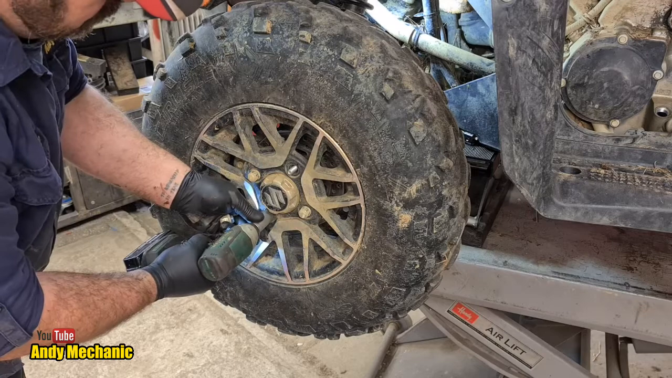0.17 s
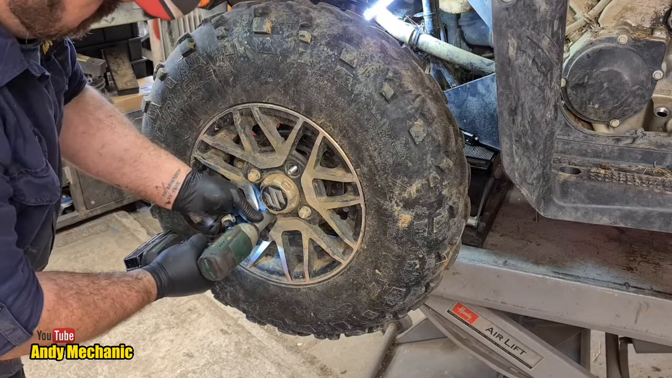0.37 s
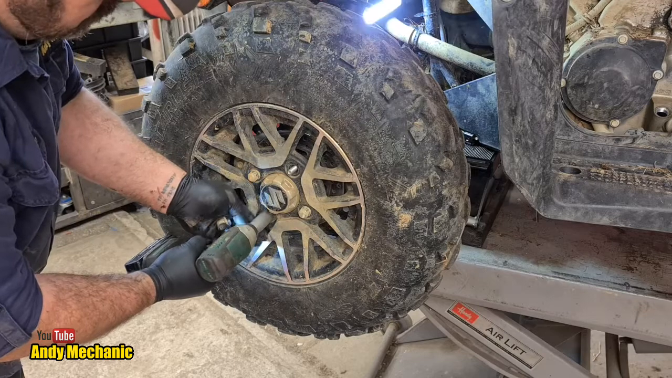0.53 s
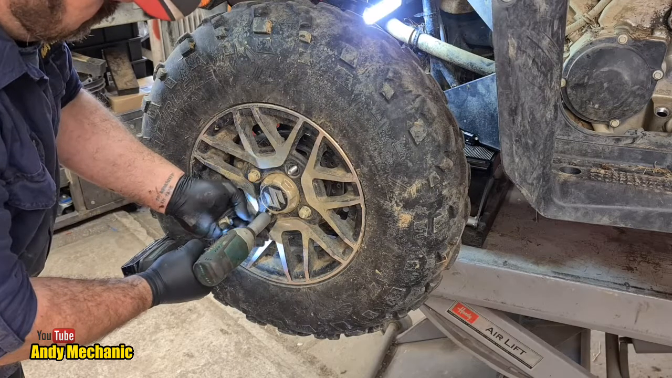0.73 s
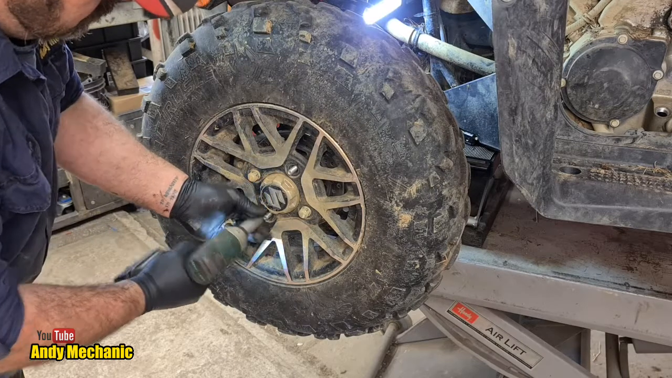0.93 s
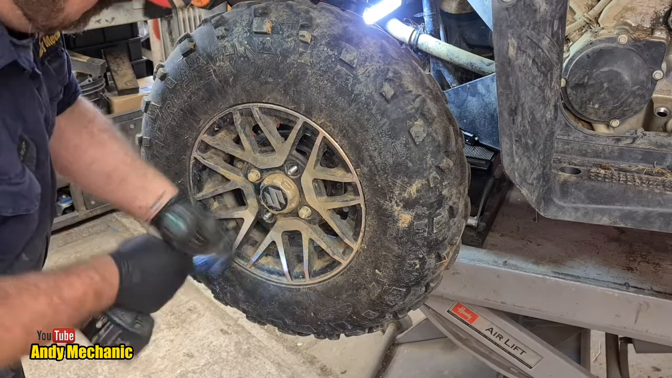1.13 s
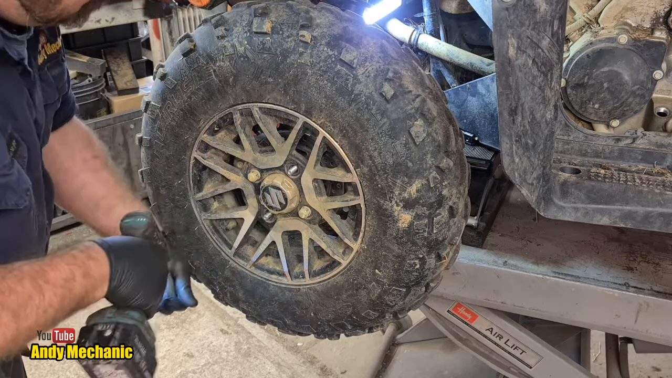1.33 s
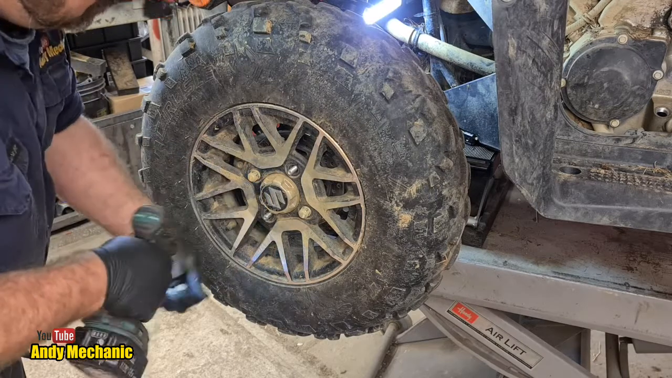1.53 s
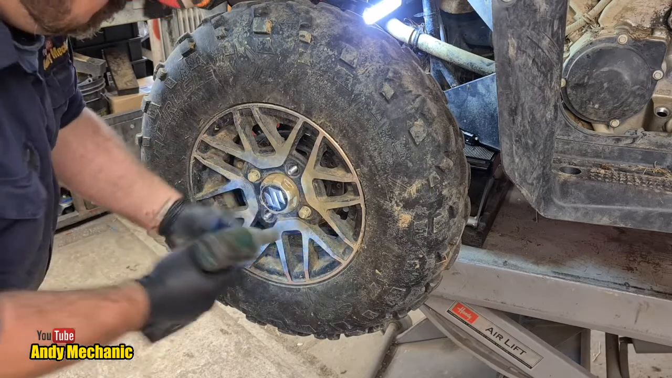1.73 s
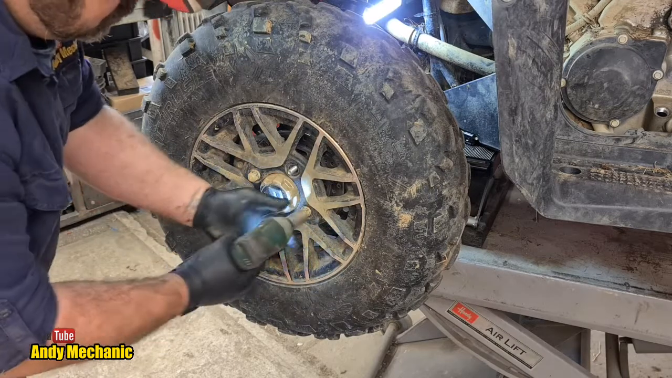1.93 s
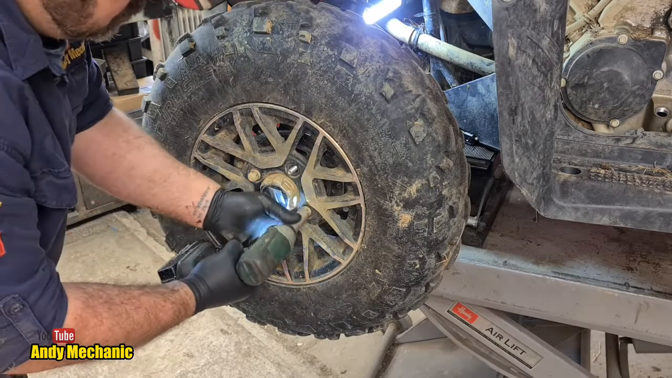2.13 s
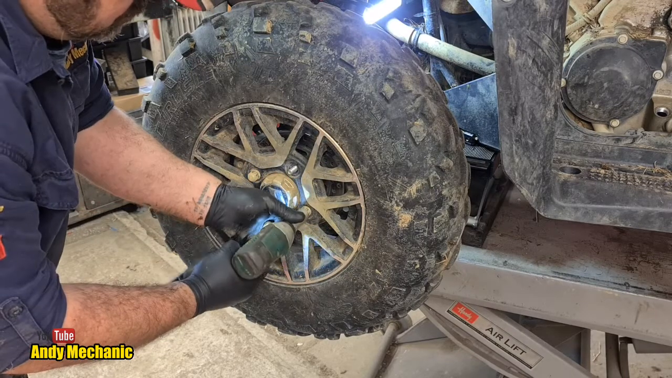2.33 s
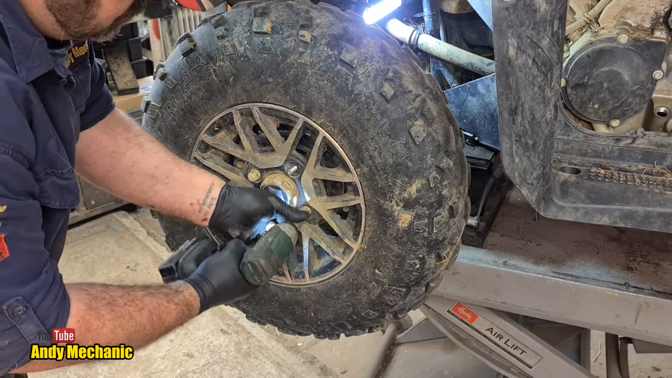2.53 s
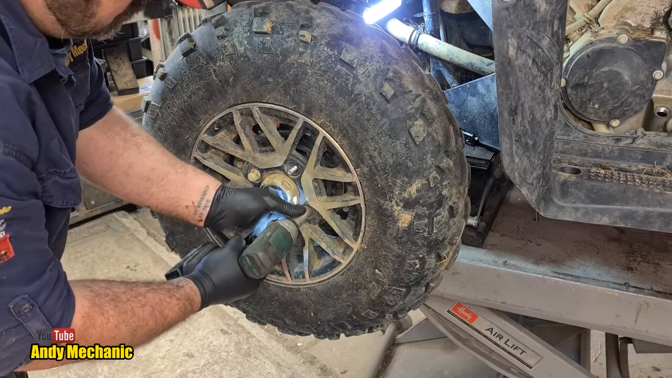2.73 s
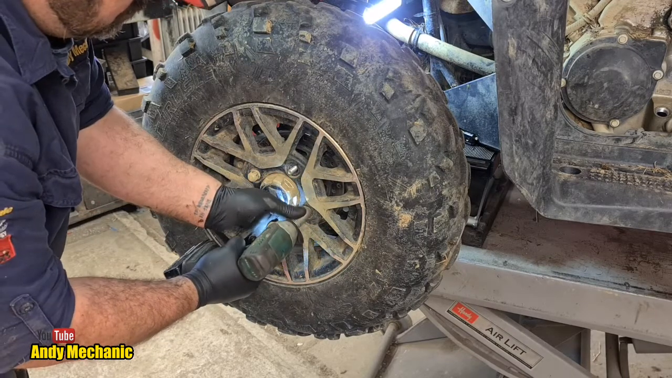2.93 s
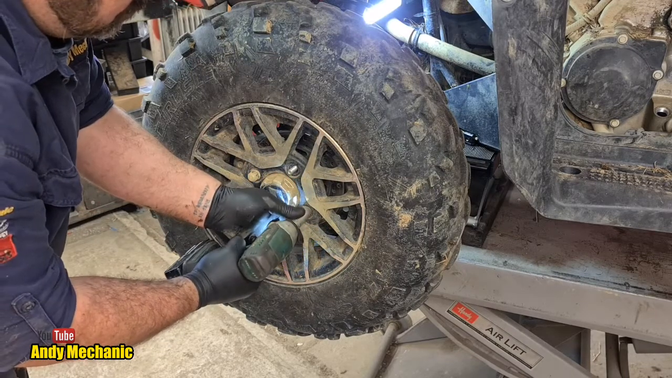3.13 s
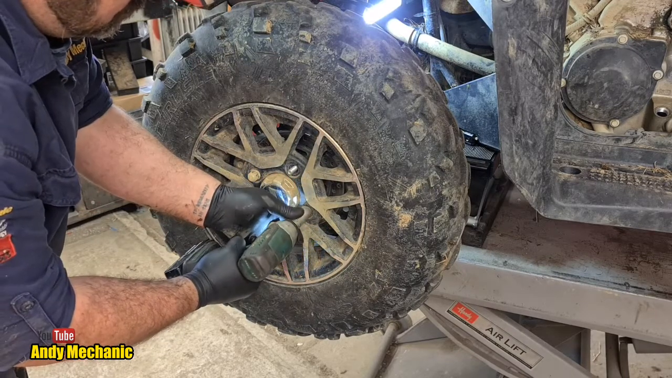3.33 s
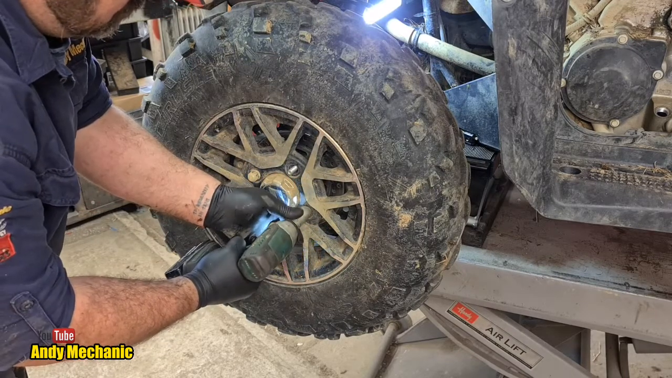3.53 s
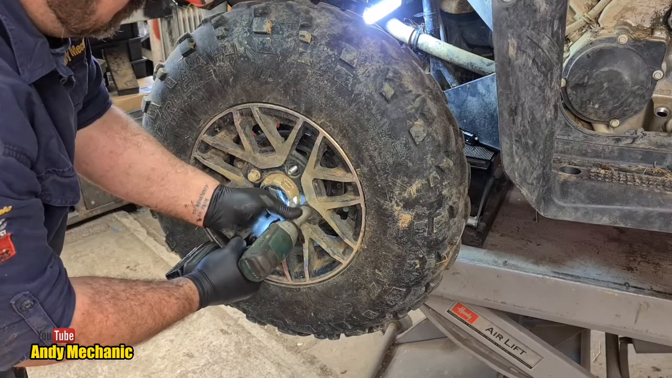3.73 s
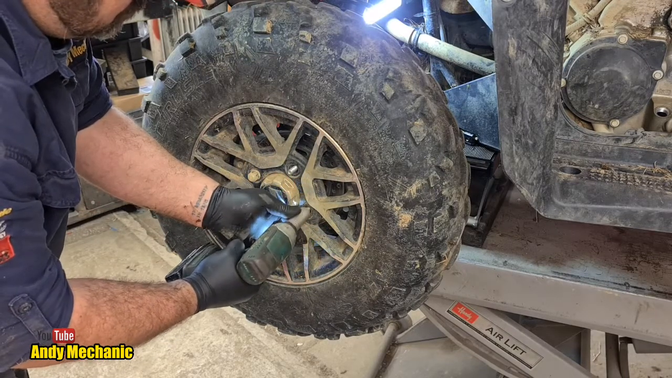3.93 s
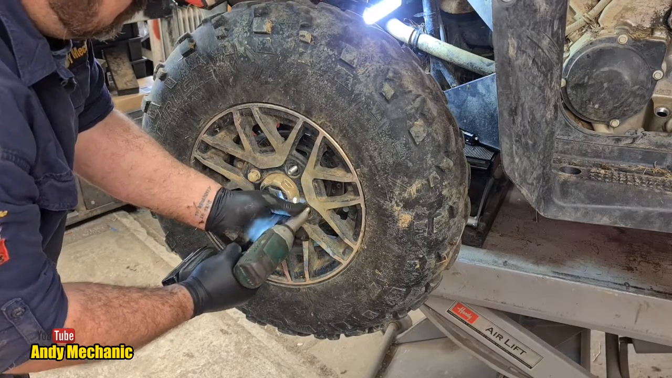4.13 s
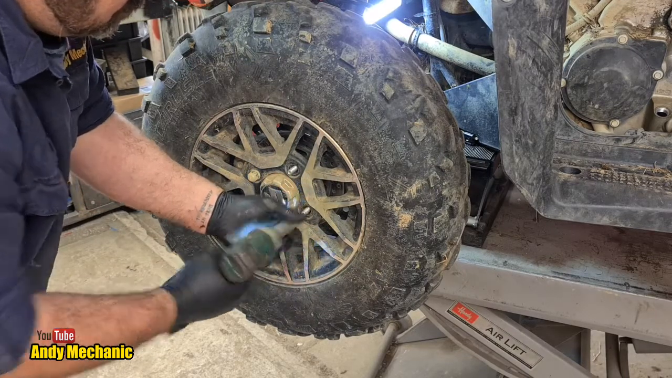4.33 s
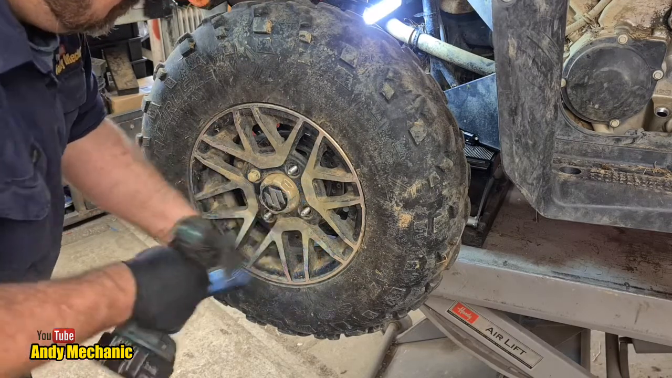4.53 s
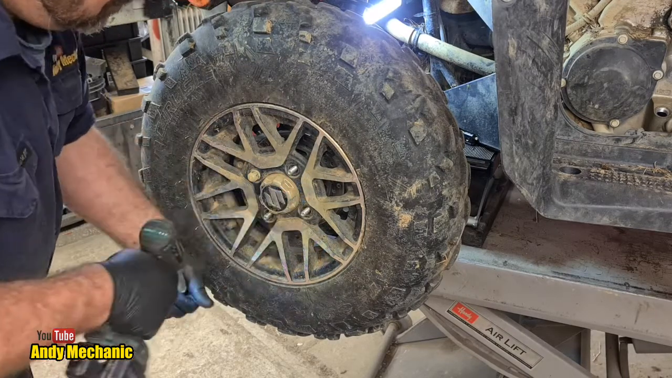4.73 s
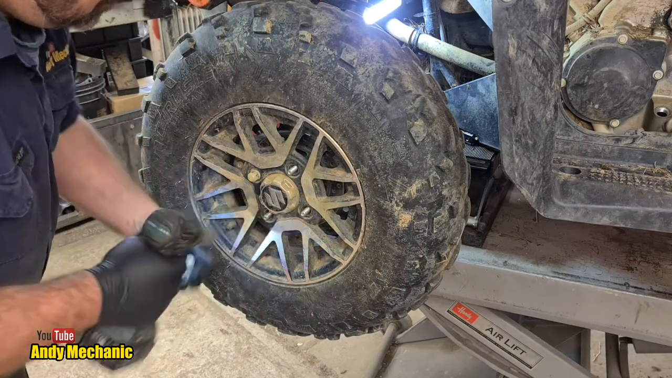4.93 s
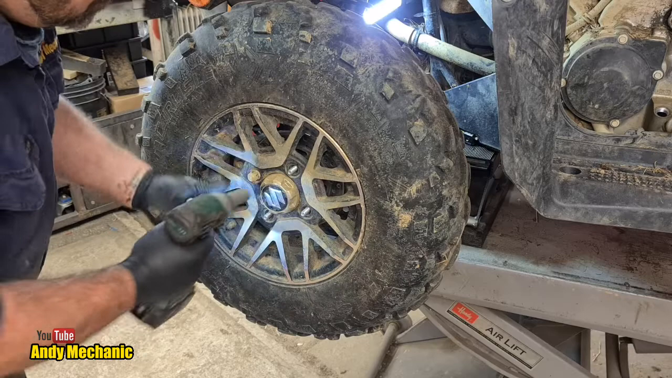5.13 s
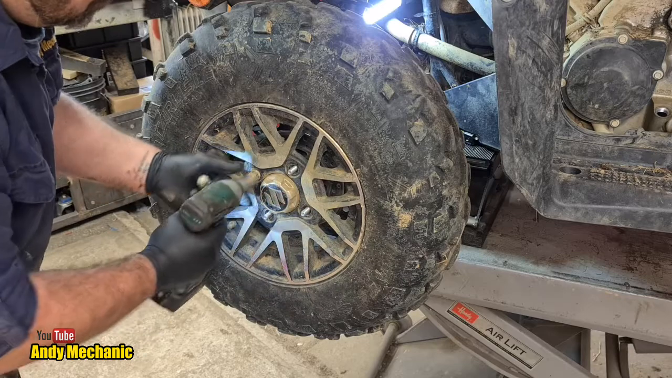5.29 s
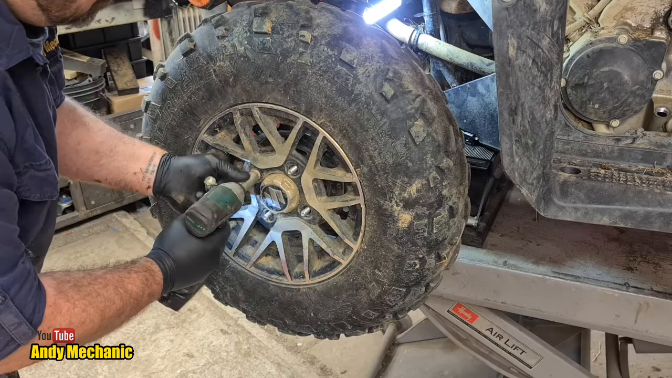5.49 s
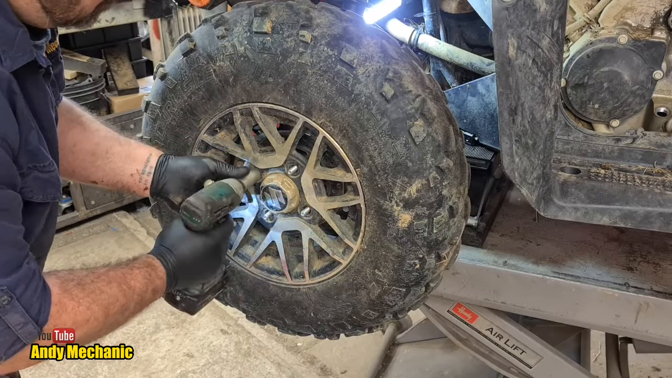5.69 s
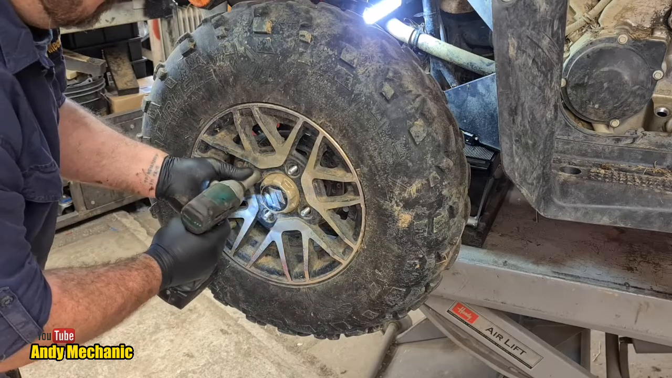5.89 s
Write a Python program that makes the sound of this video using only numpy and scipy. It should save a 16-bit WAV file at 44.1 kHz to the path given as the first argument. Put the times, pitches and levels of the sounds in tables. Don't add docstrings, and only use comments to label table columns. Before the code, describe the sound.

In a garage, rapid steel hammering on a wheel gives way to a whirring motor, then ticks, rubs and tyre thuds before the next pull.

```python
import sys
import numpy as np
from scipy import signal
from scipy.fft import rfft, irfft, next_fast_len
from scipy.io import wavfile
from scipy.ndimage import uniform_filter1d, map_coordinates

SR = 44100
rng = np.random.default_rng(int(sys.argv[2]) if len(sys.argv) > 2 else 0)


def ratio(d):
    e = np.asarray(d, float) / 20
    return 10 ** e


def inscribe(sig):
    pcm = np.round(np.clip(np.atleast_2d(sig).T, -1, 1) * 32767)
    wavfile.write(sys.argv[1], SR, pcm.astype(np.int16))


N = 262395


def unit(x):
    return x / np.sqrt(np.mean(x ** 2) + 1e-20)


def along(points, hz):
    f, v = np.transpose(points)
    return np.interp(np.log(hz + 1), np.log(f + 1), v)


def curves(rows, outside=-120.):
    s, *cols = np.transpose(rows)
    t = np.arange(N) / SR
    return [np.interp(t, s, c, outside, outside) for c in cols]


def levels(spans):
    return sum(ratio(np.array(curves(rows))) for rows in spans)


def wander(rate):
    knots = rng.standard_normal(int(N * rate / SR) + 4)
    return map_coordinates(knots, [np.arange(N) * rate / SR])


def filtered(x, response, size=8192):
    m = next_fast_len(x.shape[-1] + size)
    return irfft(rfft(x, m) * response(np.fft.rfftfreq(m, 1 / SR)), m)[..., :x.shape[-1]]


def resonances(modes):
    def mode(f, k, centre, width, db):
        return (-1) ** k * ratio(db) * 1j * f * width / (centre ** 2 - f * f + 1j * f * width)

    return lambda f: sum(mode(f, k, *m) for k, m in enumerate(modes))


def noise(spectrum):
    return unit(filtered(rng.standard_normal(N), lambda hz: ratio(along(spectrum, hz))))


def spread(pair):
    # f/Hz, correlation [0..1]
    likeness = [(60, .94), (130, 0.8), (290, 0.86), (640, 0.25), (1400, 0.031), (16000, 0.011)]

    def mid_side(hz):
        turn = np.arccos(np.clip(along(likeness, hz), -1, 1)) / 2
        return np.array([np.cos(turn), np.sin(turn)])

    mid, side = filtered(pair, mid_side)
    return np.array([mid + side, mid - side])


def struck(times, dbs, rise, t60):
    hits, t = np.zeros(N), np.arange(SR // 5) / SR
    np.add.at(hits, np.round(np.asarray(times) * SR).astype(int), ratio(dbs))
    decay = (1 - np.exp(-t / rise)) * ratio(-60 * t / t60)
    return signal.fftconvolve(hits, decay)[:N]


def add(out, s, sound):
    out[:, round(s * SR):][:, :sound.shape[1]] += sound


def floor():
    # f/Hz, level/dB per Hz
    air_colour = [(15, -46), (25, -12), (60, -5.5), (110, -13), (165, -21.5), (400, -20.5), (750, -26.5),
                  (1400, -33), (2500, -28.5), (4500, -35.5), (5500, -26.5), (6300, -41.5), (9000, -43),
                  (15000, -34.5), (15800, -61)]
    # t/s, gain/dB
    auto_gain = [(0, -17.5), (.86, -13.5), (.95, 4), (1.15, -5.5), (1.45, -3), (1.9, 1), (2.6, -1),
                 (2.7, -23), (4, -21), (4.1, -5.5), (5.1, -3), (5.7, 6.5), (5.8, -10.5), (5.95, -9)]
    air_db, hum_db, air_duck_db = -63, -63.5, -5

    gain_db, = curves(auto_gain)
    air_level_db = air_db + np.maximum(gain_db, air_duck_db) + 0.41 * wander(17)
    air = spread(np.array([noise(air_colour), noise(air_colour)]) * ratio(air_level_db))
    hum_level_db = hum_db + gain_db + 2.5 + 1.2 * wander(13)
    hum = ratio(hum_level_db) * np.sin(2 * np.pi * 100 * np.arange(N) / SR)
    return air + hum


def trigger():
    # start t/s, nut loose t/s, brake t/s, free wobble level/dB, free rattle level/dB
    pulls = [
        (-.3, .42, .868, -44.5, -41.5),
        (2.68, 3.77, 4.207, -40, -40.5),
        (5.77, 7.9, 7, -40, -40),
    ]
    rush_db = (-59, -22.5, -38, -31, -40, -36, -37.5, -34, -70.5)
    spin_up_s, settle_s, free_s, brake_s = 0.014, 0.78, 0.071, 0.012
    off_stud_s, off_stud_db = 0.1, -14.5
    shake_db, whine_db, free_whine_db, blow_rattle_db = -38, -54.5, -43.5, -39.5
    load_hz, loose_hz, free_hz, top_speed_hz = 1352, 1413, 1480, 1583

    def stages(loaded, free, late):
        return [loaded - 30] + [loaded] * 3 + [free] * 2 + [late] * 2 + [late - 35]

    spans, pitch = [], []
    for start, loose, brake, wobble_db, rattle_db in pulls:
        off = brake - off_stud_s
        settled = min(start + settle_s, loose - spin_up_s)
        s = [start, start + spin_up_s, settled, loose, loose + free_s,
             off - free_s / 2, off, brake, brake + brake_s]
        wobble = stages(shake_db, wobble_db, wobble_db + off_stud_db)
        whine = stages(whine_db, free_whine_db, free_whine_db)
        rattle = stages(blow_rattle_db, rattle_db, rattle_db)
        spans.append(np.transpose([s, rush_db, wobble, whine, rattle]))
        pitch += [(start, load_hz), (loose, loose_hz), (loose + free_s, free_hz), (brake, top_speed_hz)]
    return levels(spans), curves(pitch)[0]


def tremor():
    # f/Hz, level/dB per Hz
    shake_colour = [(12, -29.5), (25, -8), (60, -2), (110, -6), (180, -25.5)]
    rush = trigger()[0][0]
    return rush * ratio([[-18], [-32]]) * np.array([noise(shake_colour), noise(shake_colour)])


def drone():
    # start t/s, attack/s, hold/s, release/s, level/dB, f/Hz
    cavity = (.585, .03, .125, .05, -45, 209)
    s, *stages, top_db, hz = cavity
    times = s + np.cumsum([0, *stages])
    db, = curves(np.transpose([times, top_db + np.array([-20, 0, 0, -20])]))
    return ratio(db) * np.sin(2 * np.pi * hz * np.arange(N) / SR)


def rubbing():
    # start t/s, strongest t/s, end t/s, hiss level/dB, rumble level/dB
    strokes = [
        (1.296, 1.34, 1.37, -68.5, -93),
        (2.162, 2.257, 2.305, -50, -68),
        (2.468, 2.52, 2.58, -61.5, -68),
        (2.579, 2.641, 2.68, -56.5, -64.5),
        (5.298, 5.437, 5.5, -55.5, -53.5),
        (5.634, 5.751, 5.765, -58, -54.5),
    ]
    # f/Hz, level/dB per Hz
    slide_colour = [(410, -35.5), (700, -8), (973, -17.5), (1320, 0), (1430, -15), (4980, -6),
                    (12200, -16.5), (16300, -26.5)]
    in_db, out_db, rumble_in_db = -6, -21, 4.5

    spans = [[(start, hiss_db + in_db, low_db + rumble_in_db),
              (strongest, hiss_db, low_db),
              (end, hiss_db + out_db, low_db + out_db / 2)]
             for start, strongest, end, hiss_db, low_db in strokes]
    hiss, low = levels(spans)
    tyre = filtered(rng.standard_normal(N), resonances([(266, 74, -1.5), (520, 200, -4.0)]))
    grit = ratio(4 * wander(150))
    lumps = ratio(1.4 * wander(25))
    return hiss * unit(grit * noise(slide_colour)) + low * unit(lumps * tyre)


def burst(hz, width, t60):
    t = np.arange(SR // 6) / SR
    common, left, right = rng.standard_normal((3, len(t))) * ratio(-60 * t / t60)
    apart = np.clip(hz / 6000, 0, 1.5)
    strike = 0.18 * np.linalg.norm(common) * (t == 0)
    drive = np.array([common + apart * left + strike, common + apart * right + strike, t == 0])
    *puff, push = filtered(drive, lambda f: resonances([(hz, width, 0)])(f) ** 3, size=2048)
    push = unit(push) * np.std(puff)
    return np.array([*puff, push]) / np.abs(puff).max()


def contacts(events, broad_db, ring_t60, blunt):
    out = np.zeros((3, N + SR))
    for s, db, thud_db, ring_hz, bright_db, socket_db in events:
        thud = ratio(thud_db) * burst(hz=516, width=570, t60=0.044)
        ring = burst(ring_hz, blunt * ring_hz, ring_t60 * min(1, 3500 / ring_hz))
        clack = ratio(broad_db) * burst(hz=2400, width=3500, t60=0.022)
        tick = ratio(bright_db + 6.5) * burst(hz=6940, width=8200, t60=0.013)
        socket = ratio(socket_db) * burst(hz=15200, width=380, t60=0.18)
        add(out, s, ratio(db - 3.0) * (thud + ring + clack + tick + socket))
    return out[:, :N]


def knocks():
    # t/s, peak level/dB, ring f/Hz, thud level/dB, bright level/dB
    rim_knocks = [(1.9096, -24, 1440, 3, -11.5), (1.9154, -19.5, 1630, -8.5, -28.5),
                  (2.0347, -47, 1480, 1, -12), (2.0976, -30.5, 1900, -28, -7.5),
                  (2.1629, -39.5, 1240, 2.5, -6), (2.1784, -31, 4220, -4.5, -4.5),
                  (2.21, -37.5, 1290, -9, -8), (2.2338, -40, 4200, -18, 0), (2.2488, -37, 5200, -8, 0.5),
                  (2.262, -40.5, 5600, -11.5, -1.5), (2.2823, -44, 5000, -20, -0.5),
                  (2.4732, -40, 2420, -19, -8.5), (2.5299, -52.5, 1510, -1.5, -7),
                  (2.602, -53, 1945, 4, -7.5), (2.616, -44.5, 1870, -5, -14.5),
                  (2.7173, -12.5, 2108, -14, -12), (5.2386, -30.5, 2610, -1, -33),
                  (5.286, -16, 2920, -2, -25.5), (5.6231, -25, 2830, 5, -7.5)]
    # t/s, peak level/dB, ring f/Hz, bright level/dB
    thin_ticks = [(1.095, -69.5, 2790, 12), (1.163, -59, 1300, 2), (1.526, -72.5, 2490, 7),
                  (1.593, -69, 2740, 6), (2.565, -54, 2995, 6), (2.6804, -33, 2520, -3),
                  (3.984, -28.5, 1480, 5.5), (4.04, -25, 2000, -5), (4.208, -31.5, 2890, 7.5),
                  (4.853, -50, 2420, -14), (5.2738, -23.5, 2800, -7.5), (5.4321, -34.5, 5550, -2),
                  (5.5337, -67, 1900, 12), (5.7667, -28, 5200, -3)]
    # t/s, peak level/dB, ring f/Hz, thud level/dB, bright level/dB
    rim_pings = [
        (1.0694, -69.5, 1480, -12.5, -8.5),
        (1.3346, -53.5, 1350, -11, -9),
        (1.468, -47, 1860, -25, -12),
        (2.37, -53, 1430, -2, -10),
        (4.381, -42, 1970, -17, -10),
        (4.4869, -47.5, 1340, -14, -0.5),
        (4.838, -28.5, 2530, -47, -3.5),
    ]
    # t/s, peak level/dB, bright level/dB, socket ring level/dB
    hard_snaps = [
        (.8825, -12, 5, -6.5),
        (1.8972, -24, -1, -0.5),
        (4.2259, -16, 9, 2),
    ]
    # t/s, peak level/dB, ring f/Hz
    nut_jingles = [
        (1.32, -66, 14860),
        (3.925, -24, 13500),
        (4.0867, -9.5, 13100),
        (4.094, -11, 12500),
        (4.1406, -15, 14000),
        (4.658, -58, 14900),
    ]
    # t/s, level/dB, f/Hz
    shoves = [
        (1.915, -38, 221.3),
        (5.24, -57, 172),
        (5.288, -29.5, 205),
        (5.625, -28, 228.2),
        (2.563, -48.5, 280),
        (2.597, -44, 274),
        (2.692, -37.5, 175),
    ]
    tyre = np.zeros((3, N + SR))
    for s, db, hz in shoves:
        add(tyre, s, ratio(db) * burst(hz, width=210, t60=0.1))

    # t/s, peak/dB, thud/dB, ring f/Hz, bright/dB, socket/dB
    knock = [(s, db, thud, hz, bright, -28) for s, db, hz, thud, bright in rim_knocks]
    tick = [(s, db, -14, hz, bright, bright - 23) for s, db, hz, bright in thin_ticks]
    snap = [(s, db, -10, 1450, bright, socket) for s, db, bright, socket in hard_snaps]
    ping = [(s, db, thud, hz, bright, -26) for s, db, hz, thud, bright in rim_pings]
    jingle = [(s, db, -39, hz, -18, -22) for s, db, hz in nut_jingles]
    return (contacts(knock + tick, broad_db=5, ring_t60=0.035, blunt=0.55)
            + contacts(snap, broad_db=6.5, ring_t60=0.024, blunt=0.3)
            + contacts(ping, broad_db=-16.0, ring_t60=0.039, blunt=0.53)
            + contacts(jingle, broad_db=-20.0, ring_t60=0.09, blunt=0.11)
            + tyre[:, :N])


def motor():
    # f/Hz, level/dB per Hz
    gear_colour = [(530, -39.5), (900, -14), (1120, -11), (1530, 0.5), (1980, -6), (3850, -7.5), (5960, -7),
                   (9920, -22), (12500, -12), (15300, -12), (16300, -29)]
    # f/Hz, level/dB per Hz
    rattle_colour = [(5000, -33), (8000, -5.5), (11000, -6.5), (12500, -5.5), (15300, -1.5), (16300, -28.5)]
    # f/Hz, width/Hz, level/dB
    wobble_modes = [(225.9, 180, -7.5), (428, 86, 0.5), (556, 230, 0), (763, 220, 2.5)]
    # multiple of the pitch, level/dB
    overtones = [(1, -4), (2, -8), (3, -9), (4, -7.5)]

    (rush, shake, whine, rattle), winding_hz = trigger()
    turn = 2 * np.pi * np.cumsum(winding_hz * (1 + 0.006 * wander(90))) / SR
    tone = sum(ratio(db + 4.3 * wander(70)) * np.sin(k * turn) for k, db in overtones)
    meshing = ratio(6.4 * np.tanh(wander(250)))
    teeth = unit(meshing * np.array([noise(gear_colour), noise(gear_colour)]))
    play = unit(ratio(2.8 * wander(200)) * np.array([noise(rattle_colour), noise(rattle_colour)]))
    nut = unit(ratio(2 * wander(60)) * filtered(rng.standard_normal(N), resonances(wobble_modes)))
    return rush * teeth + rattle * play + whine * tone + shake * nut


def blows():
    # blow number, t/s, second jaw late/ms
    beat = [
        [(0, .0112, .7), (16, .2993, .5), (20, .374, -.6)],
        [(0, 2.724, .4), (14, 2.9771, .7), (22, 3.1245, 0), (38, 3.4262, 0), (42, 3.5014, 0), (43, 3.5214, 0),
         (52, 3.6826, 0), (56, 3.757, 0)],
        [(0, 5.808, 0), (7, 5.9343, 0)],
    ]
    # t/s, crack level/dB, thump level/dB
    strays = [
        (0.3892, -20.5, -33),
        (0.4059, -11, -32),
        (2.6946, -21, -19.5),
        (2.7113, -15.5, -17.5),
        (2.7188, -16, -24),
        (5.7949, -8.5, -27),
    ]
    # t/s, thump level/dB, second jaw over first/dB
    grip = [(0, -27, -2), (.4, -27, 1), (2.72, -34, 12), (3, -33, 11), (3.1, -23.5, 4.5), (3.5, -21.5, 6),
            (3.76, -28.5, 4), (5.8, -28.5, 4.5), (5.95, -21.5, 3)]
    crack_level_db, jaw_crack_db = -10, -1
    scatter_db = [0.74, 1.5]

    grip_s, thump_level_db, jaw_thump_db = np.transpose(grip)
    rows = []
    for number, s, late_ms in map(np.transpose, beat):
        k = np.arange(number[-1] + 1)
        at = np.interp(k, number, s)
        second = k % 2
        luck = rng.standard_normal((len(k), 2)) * scatter_db
        times = at + second * np.interp(k, number, late_ms) / 1000
        crack_db = crack_level_db + jaw_crack_db * second + luck[:, 0]
        thump_db = np.interp(at, grip_s, thump_level_db) + second * np.interp(at, grip_s, jaw_thump_db)
        rows += zip(times, crack_db, thump_db + luck[:, 1])
    return np.array(sorted(rows + strays))


def hammer():
    # f/Hz, level/dB per Hz
    crack_colour = [(70, -44.5), (150, -26), (350, -19), (600, -13.5), (950, -13.5), (1400, -10),
                    (2400, -11.5), (3200, -8), (5000, -11), (7500, -9.5), (11000, -11.5), (13100, -8.5),
                    (15400, -7.5), (16300, -37)]
    # f/Hz, width/Hz, level/dB
    anvil_modes = [(13300, 2100, 0)]

    s, crack_db, thump_db = blows().T
    shared = noise(crack_colour)
    steel = unit(np.array([shared + 1.23 * noise(crack_colour), shared + 1.97 * noise(crack_colour)]))
    snap = struck(s - 0.0006, crack_db, rise=0.0012, t60=0.011)
    body = struck(s, crack_db - 8, rise=0.0014, t60=0.039)
    crack = steel * (ratio(8.5) * snap + body)
    shrill = unit(filtered(rng.standard_normal((2, N)), lambda f: resonances(anvil_modes)(f) ** 2))
    shrill_db = crack_db - 0.5 + 4 * rng.standard_normal(len(s))
    crack += shrill * struck(s - 0.0004, shrill_db, rise=0.00094, t60=0.0094)

    t = np.arange(SR // 25) / SR

    def swell(delay, width):
        return np.exp(-0.5 * ((t - delay) / width) ** 2)

    thump = swell(delay=0.0031, width=0.0011) * np.sin(2 * np.pi * 720 * t)
    thump += ratio(-16.5) * swell(delay=0.0016, width=0.0013) * np.sin(2 * np.pi * 300 * t)
    even = uniform_filter1d(s, size=5)
    even = np.where(np.abs(even - s) < 1 / 1000, even, s)
    pushes = np.zeros(N)
    pushes[np.round(even * SR).astype(int)] = ratio(thump_db + 3)
    return crack, signal.fftconvolve(pushes, thump)[:N]


def walls(x, count=12):
    # f/Hz, t60/s
    decay_times = [(150, 0.38), (400, 0.33), (1000, 0.25), (3000, 0.34), (8000, 0.26), (16000, 0.19)]
    out = np.zeros((2, N + SR))
    for part in np.array_split(np.arange(N), count):
        hz, t, z = signal.stft(rng.standard_normal((2, SR // 2)), SR, nperseg=256)
        fade = ratio(-60 * t / along(decay_times, hz)[:, None])
        tail = signal.istft(z * fade, SR, nperseg=256)[1]
        wet = signal.fftconvolve(x[None, part], tail / np.linalg.norm(tail[0]), axes=1)
        out[:, part[0] + 200:][:, :wet.shape[1]] += wet
    return spread(out[:, :N])


def ports(x):
    # f/Hz, level/dB
    lean = [(500, 1), (2500, 0.5), (5000, 12), (9000, 3), (13000, 5.5)]
    lag_s = 4.5 / SR
    side = np.array([[0.5], [-0.5]])
    return filtered(x, lambda hz: ratio(side * along(lean, hz)) * np.exp(2j * np.pi * hz * lag_s * side))


def scene():
    crack, thump = hammer()
    running, knock, rub = motor(), knocks(), rubbing()
    direct = ports(crack + thump + running + knock[:2] + rub + drone())
    echo = walls(ratio(-0.5) * crack[0] + ratio(-4.0) * thump + ratio(-1.5) * running[0]
                 + ratio(-3.5) * (knock[2] + rub))
    return direct + echo + tremor() + floor()


def top_cut(x):
    return signal.sosfilt(signal.butter(12, 16450, fs=SR, output="sos"), x)


def record(dry):
    top_hz, edge_hz = 16100, 120
    heard = filtered(dry, lambda hz: 0.5 - 0.5 * np.tanh((hz - top_hz) / edge_hz))
    mix = heard / (1 + np.abs(heard) ** 6) ** (1 / 6)
    return top_cut(mix)


dry = scene()
out = record(dry)
inscribe(out)
```